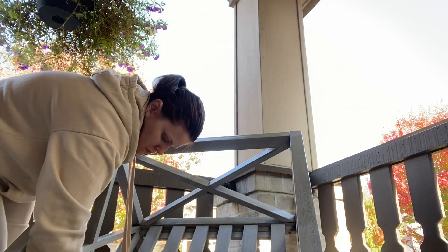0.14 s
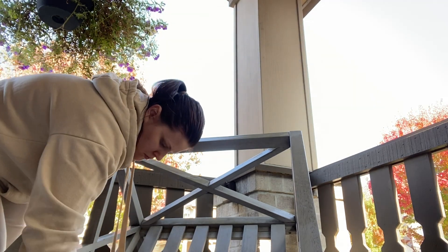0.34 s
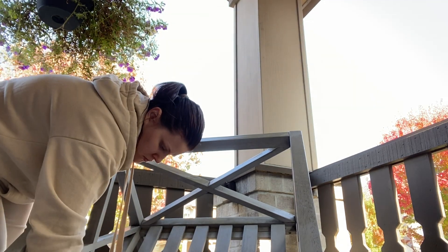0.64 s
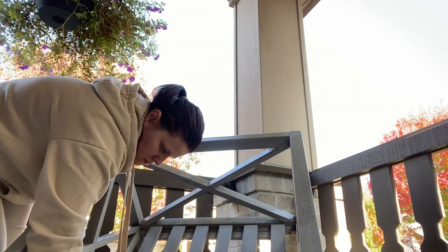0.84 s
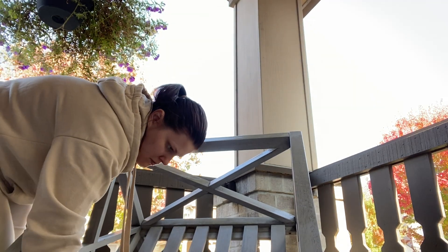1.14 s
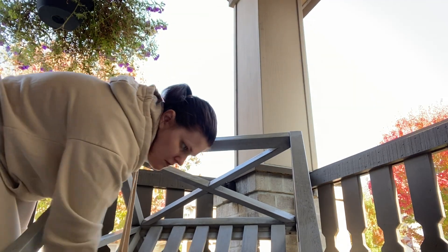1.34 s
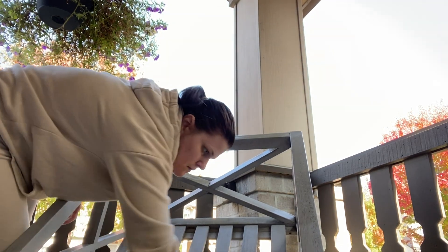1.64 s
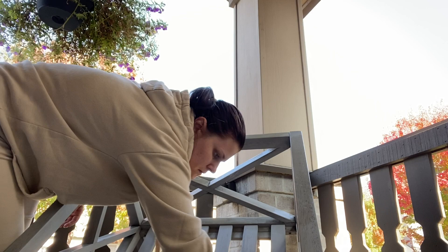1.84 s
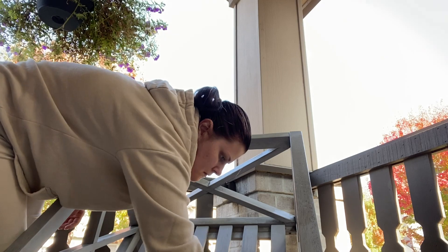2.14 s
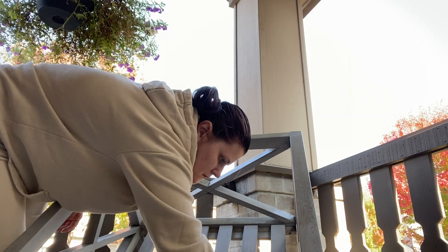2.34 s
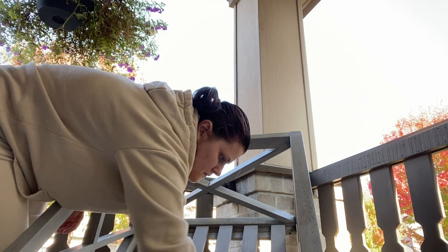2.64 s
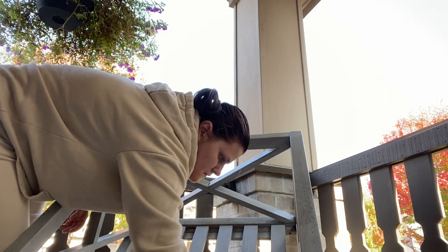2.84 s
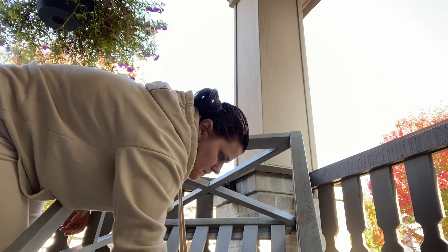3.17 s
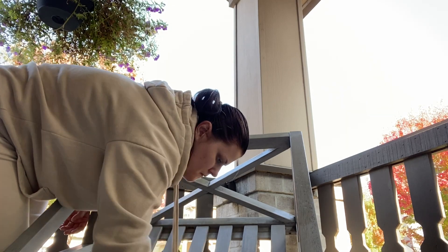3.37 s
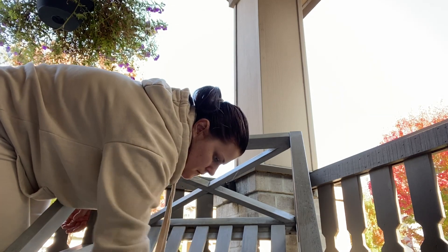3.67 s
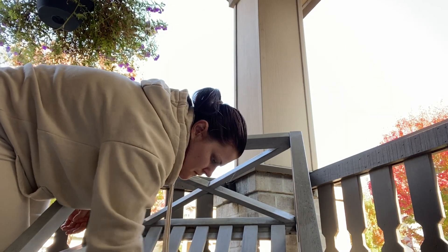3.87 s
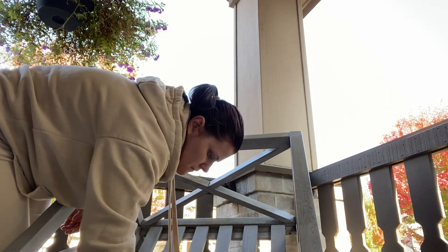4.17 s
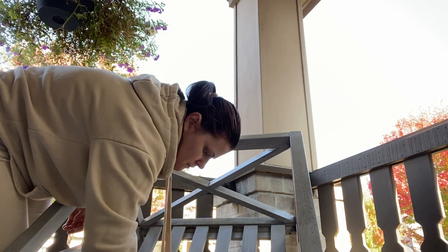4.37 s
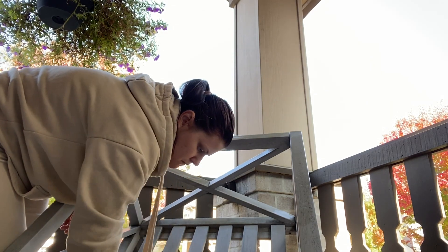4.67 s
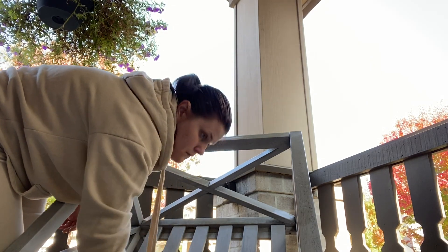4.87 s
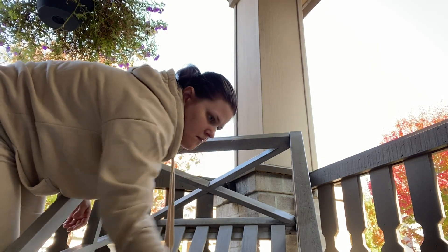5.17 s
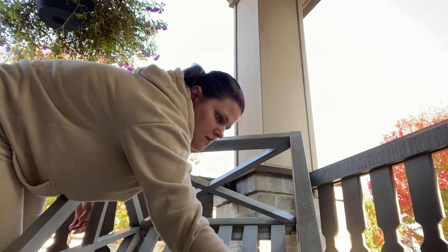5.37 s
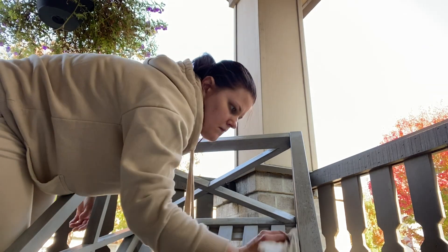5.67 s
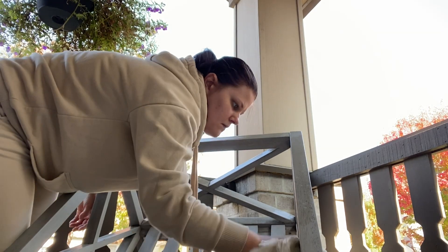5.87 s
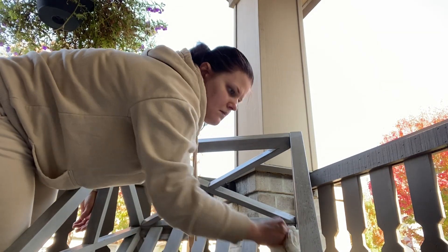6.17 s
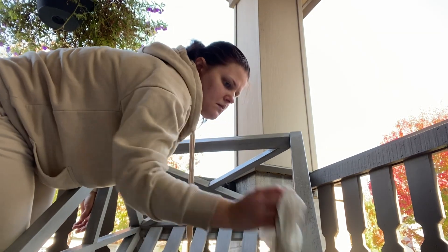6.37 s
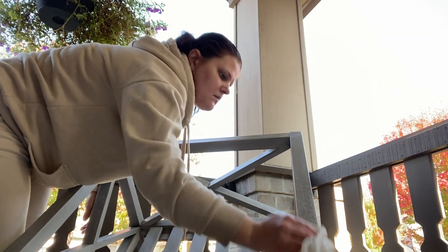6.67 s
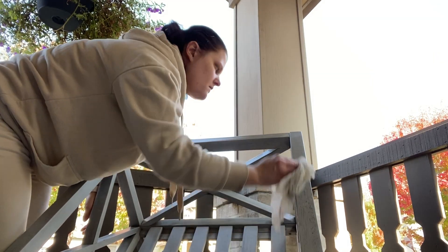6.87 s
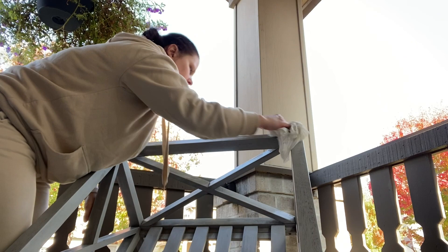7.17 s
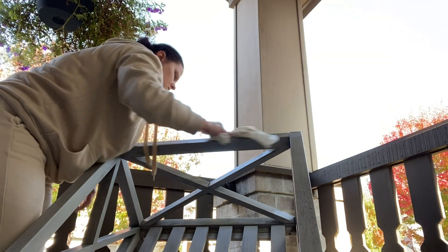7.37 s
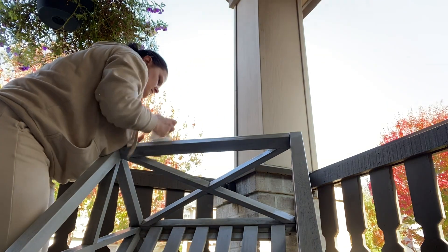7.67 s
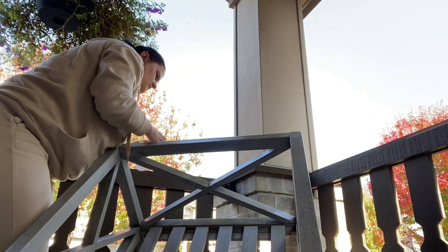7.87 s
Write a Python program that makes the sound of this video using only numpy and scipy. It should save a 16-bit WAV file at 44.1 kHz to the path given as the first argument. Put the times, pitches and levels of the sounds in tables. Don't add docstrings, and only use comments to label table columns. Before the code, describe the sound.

Distant traffic rumbles low throughout on an open porch, a nearer car swelling around 0.5 s, with very faint hiss. Close to the microphone a damp cloth wipes painted wooden slats in uneven flicks and drags, grainy and midrange-bright, with small low squeaks in the first second. A soft knock comes at 0.3 s, then firm hollow chair-leg knocks at 1.35 and 1.7 s, a slat humming briefly after. Rubbing continues, with a duller knock at 3.15 s and a sharper squeak and tick at 4.4 s. At 5.7 s a leg lands and skids on grit with a splintery crack. Strong knocks follow at 6.2, 6.35 and 6.75 s, boards booming and jolting the microphone, then a heel thud at 7 s. Longer airy wipes lead to small hard taps on the rail: chiming at 7.4 s, dull at 7.5 s, snappy at 7.95 s.

```python
import sys
import numpy as np
from scipy import signal
from scipy.fft import rfft, irfft, next_fast_len
from scipy.io import wavfile
from scipy.ndimage import uniform_filter1d

SR = 44100
rng = np.random.default_rng(int(sys.argv[2]) if len(sys.argv) > 2 else 0)


def wrap_up_sound(samples):
    columns = np.atleast_2d(samples).T
    tamed = np.clip(columns, -1, 1)
    steps = np.round(tamed * 32767).astype(np.int16)
    wavfile.write(sys.argv[1], SR, steps)


def decibels_to_gain(level_db):
    exponent = np.asarray(level_db, float) / 20
    return 10 ** exponent


N = 353241
HOP = 128


def read(points, hz):
    f, value = np.transpose(points)
    return np.interp(np.log(hz + 1), np.log(f + 1), value)


def evened(x):
    return x / np.sqrt(np.mean(x ** 2) + 1e-20)


def coloured(points):
    size = next_fast_len(N)
    gain = decibels_to_gain(read(points, np.fft.rfftfreq(size, 1 / SR)))
    return evened(irfft(rfft(rng.standard_normal((2, size))) * gain, size)[:, :N])


def bandpassed(x, low_hz, high_hz):
    return signal.lfilter(*signal.butter(2, [low_hz, high_hz], "bandpass", fs=SR), x)


def ring(modes, rise_cycles, scatter_db, spread):
    beat_depth, beat_share, detune = 0.6, 0.035, 0.012
    hz, db, t60 = np.transpose(modes)[:, :, None]
    t = np.arange(round(SR * min(t60.max(), 0.5))) / SR
    chance, turn, shift, apart = rng.standard_normal((4, 2, len(modes), 1))
    swell = (1 - np.exp(-t * hz / rise_cycles)) ** 2
    beat = 1 + beat_depth * np.cos(2 * np.pi * beat_share * hz * apart[0] * t)
    decay = decibels_to_gain(db + scatter_db * chance - 60 * t / t60)
    tone = np.sin(2 * np.pi * (hz * (1 + detune * shift[0]) * t + spread * turn))
    return (decay * swell * beat * tone).sum(1)


def tilted(modes, db_per_octave, centre_hz):
    return [(hz, db + db_per_octave * np.log2(hz / centre_hz), t60) for hz, db, t60 in modes]


def snap(low_hz, high_hz, t60, rise_s=0.00044):
    t = np.arange(SR // 8) / SR
    burst = rng.standard_normal((2, len(t))) * decibels_to_gain(-60 * t / t60) * (1 - np.exp(-t / rise_s))
    return bandpassed(burst, low_hz, high_hz)


def add(mix, s, db, sound):
    part = mix[:, round(s * SR):][:, :sound.shape[1]]
    part += decibels_to_gain(db) * sound[:, :part.shape[1]] / abs(sound[0]).max()


def lumpy(x):
    patchy_db = 2.5
    z = signal.stft(x, nperseg=8 * HOP)[2]
    lumps = rng.standard_normal(z.shape[:0:-1])
    lumps = uniform_filter1d(uniform_filter1d(lumps, size=6, axis=0), size=3, axis=1)
    return evened(signal.istft(z * decibels_to_gain(patchy_db * evened(lumps).T), nperseg=8 * HOP)[1][:, :N])


# time in seconds, level in dB.
TRAFFIC_SWELL = [(0.0, -45.5), (0.15, -48), (0.82, -46.5), (1.4, -51), (1.61, -46), (2.34, -48.5),
                 (2.88, -47), (3.77, -47), (4.35, -50.5), (4.55, -46.5), (5.29, -48), (6.0, -46.5),
                 (6.31, -50.5), (7.63, -48.5), (8.01, -49.5)]
# frequency in Hz, density in dB per Hz.
RUMBLE_SPECTRUM = [(20, -8.5), (40, -44.5), (55, 8), (100, 3), (160, -2.5), (230, -9), (400, -17.5),
                   (700, -83)]
ROAR_SPECTRUM = [(150, -1), (350, 3.5), (650, 3.5), (900, -1.5), (1300, -15.5), (2500, -29.5),
                 (4500, -33.5), (7500, -67)]
AIR_SPECTRUM = [(3000, -18), (5500, 1), (8000, 0), (12500, -3), (14200, -6), (15000, -24)]


def traffic():
    roar_level_db, roar_follows, air_db = -58.5, 0.23, -86.5
    pass_s, pass_width_s, pass_db = 0.54, 0.22, 4
    t = np.arange(N) / SR
    rumble_db = np.interp(t, *np.transpose(TRAFFIC_SWELL))
    near_db = pass_db / (1 + ((t - pass_s) / pass_width_s) ** 2)
    roar_db = roar_level_db + roar_follows * (rumble_db - rumble_db.mean()) + near_db
    rumble = decibels_to_gain(rumble_db + 3.0) * coloured(RUMBLE_SPECTRUM)
    roar = decibels_to_gain(roar_db) * lumpy(coloured(ROAR_SPECTRUM))
    return rumble + roar + decibels_to_gain(air_db) * coloured(AIR_SPECTRUM)


# start in seconds, length in seconds,
# pressure in dB, change of pressure in dB, fibre hiss over the rub in dB.
FLICKS = [(0, 0.014, -64, 0, -11), (0.188, 0.053, -75, 17.5, -8), (0.505, 0.045, -80, 14, -0.5),
          (0.643, 0.035, -64.5, -15.5, 0.5), (0.772, 0.028, -64, -1, -9), (0.946, 0.016, -57, -3.5, -8.5),
          (1.741, 0.092, -73, 14.5, -8), (1.936, 0.028, -63, 7.5, -12.5), (2.37, 0.038, -60, 3, -18.5),
          (2.618, 0.017, -69.5, 4, -12), (2.762, 0.13, -61, 3, -14.5), (3.036, 0.016, -98, 23.5, -13),
          (3.149, 0.047, -69, 4, -7), (3.426, 0.0093, -59, -1, -8.5), (3.559, 0.077, -68.5, 14.5, -8.5),
          (4.217, 0.032, -75.5, 14.5, -11.5), (4.395, 0.11, -54.5, -8, -9.5),
          (4.549, 0.046, -69.5, 7.5, -9), (4.728, 0.11, -62.5, -10.5, -11), (4.871, 0.046, -63.5, 0, -6.5),
          (5.741, 0.048, -73, 7.5, -8.5), (6.111, 0.089, -59, -14, -3.5), (7.722, 0.06, -72.5, 2.5, -29),
          (7.939, 0.06, -55.5, -12, -11)]
DRAGS = [(0.3, 0.14, -74, -19, -12), (1.04, 0.066, -84, 6, -9), (1.14, 0.11, -69.5, 2.5, -9),
         (1.326, 0.18, -65, -3, -9.5), (1.529, 0.16, -71, 2.5, -2), (1.864, 0.16, -72.5, 1.5, -6.5),
         (2.114, 0.27, -66.5, -7.5, -8), (3.223, 0.14, -83, -5, -21), (3.708, 0.083, -77, -15, -22),
         (3.906, 0.14, -75.5, 10, -7), (4.106, 0.066, -61.5, -15, -24), (4.952, 0.22, -64.5, -17.5, -14),
         (5.105, 0.15, -75, 12.5, -11.5), (5.299, 0.16, -71, 5.5, -7), (5.544, 0.069, -70, 1, -1.5),
         (5.86, 0.13, -69, 2.5, -3.5), (6.276, 0.19, -93, 23, -10), (6.578, 0.1, -73.5, 6.5, -4),
         (6.72, 0.26, -73, 2.5, -3), (6.985, 0.091, -80, 3, -5), (7.154, 0.37, -67, -6, -1.5),
         (7.375, 0.16, -67, 0, -6.5), (7.584, 0.21, -88, -24, -1)]


def pressure(t):
    land_db_per_s, lift_db_per_s, drag_softer = 1108, 325, 0.5
    usual_db, hiss_steeper = -68, 1.45
    drone_follows, fizz_follows, fizz_brighter = 0.75, 0.82, 1.28
    start, length, db, change_db, hiss_db = np.array(FLICKS + DRAGS).T[:, :, None]
    flick = (np.arange(len(start)) < len(FLICKS))[:, None]
    held_db = db + change_db * np.clip((t - start) / length, 0, 1)
    early_s, late_s = np.maximum(start - t, 0), np.maximum(t - start - length, 0)
    edge_db = -(land_db_per_s * early_s + lift_db_per_s * late_s) * np.where(flick, 1, drag_softer)
    over_db = held_db - usual_db
    drone_db = np.where(flick, -0.5, 1) + usual_db + drone_follows * over_db
    fizz_db = np.where(flick, -0.5, 1.5) + usual_db + fizz_follows * over_db + fizz_brighter * hiss_db
    layers_db = [held_db + edge_db,
                 drone_db + edge_db,
                 held_db + hiss_db + hiss_steeper * edge_db,
                 fizz_db + hiss_steeper * edge_db]
    return [np.sqrt((decibels_to_gain(layer_db) ** 2).sum(0) + 1e-14) for layer_db in layers_db]


# start in seconds, ringing in dB, three resonances in Hz.
SLATS = [(0.18, 1.7, 2450, 3100, 4860), (0.5, 5.7, 2680, 3100, 4440), (0.61, 9.9, 2630, 3620, 4560),
         (0.74, 6.6, 2280, 3470, 4700), (0.91, 7, 2660, 3380, 4670), (1.08, 2, 1840, 2100, 2570),
         (1.76, 4.2, 1840, 2250, 3270), (1.91, 2.7, 1480, 1930, 2420), (2.35, 1.9, 2030, 2830, 3900),
         (2.74, 1.7, 1390, 2180, 3270), (3.4, 5.9, 2030, 4570, 7800), (3.54, 4.7, 2140, 3760, 4500),
         (3.9, 3.6, 1830, 3120, 3760), (4.21, 4, 2110, 2530, 3800), (4.37, 8.3, 1330, 2600, 4140),
         (4.425, 7.6, 2560, 3960, 7200), (4.55, 1.7, 2000, 3300, 4000), (4.68, 4.5, 1920, 3180, 5440),
         (4.85, 1, 1990, 3100, 4060), (5.18, 1.7, 1880, 2230, 3670), (5.84, 0.91, 2130, 2300, 6740),
         (6.58, 3.9, 1260, 1790, 2140)]


def slat_tone_db(hz, t):
    place = uniform_filter1d(rng.standard_normal((len(t), len(hz))), size=40, axis=0)
    drift_db = 4.24 * evened(place).T * np.clip(1.2 - hz / 12000, 0, 1)[:, None]
    table = np.array(SLATS)
    slat = table[np.maximum(np.searchsorted(table[:, 0], t) - 1, 0)]
    peaks = sum(1 / (1 + ((hz[:, None] - f) / (70 + 0.025 * f)) ** 2) for f in slat[:, 2:].T)
    return drift_db + 1.5 * slat[:, 1] * (peaks - 0.3)


# frequency in Hz, density in dB per Hz.
RUB_SPECTRUM = [(700, -52), (1500, -14.5), (2200, 6.5), (4200, 2.5), (5200, -10), (8000, -23), (15000, -7)]
DRONE_SPECTRUM = [(400, -8), (900, 6.5), (1300, 1), (1800, 1.5), (3000, -20.5)]
HISS_SPECTRUM = [(2500, 8), (5000, 14.5), (8000, 13), (11000, 12.5), (14000, 10), (16000, 10)]


def cloth():
    grit_per_s, grit_db = 500, -11
    steps = np.arange(0, N + HOP, HOP // 2) / SR
    rub, drone, hiss, _ = (np.interp(np.arange(N) / SR, steps, gain) for gain in pressure(steps))
    grain = decibels_to_gain(2.0 * uniform_filter1d(rng.standard_normal(N), size=60) * np.sqrt(60))
    slips = decibels_to_gain(-3.5) * rub * coloured(RUB_SPECTRUM)
    slips += decibels_to_gain(-1.5) * drone * coloured(DRONE_SPECTRUM)
    slips += decibels_to_gain(6.5) * hiss * coloured(HISS_SPECTRUM)
    speck_size = decibels_to_gain(4.4 * np.minimum(rng.exponential(1, N), 4))
    specks = (rng.random(N) < grit_per_s / SR) * speck_size * rng.choice([-1., 1.], (2, N))
    slips += decibels_to_gain(grit_db) * rub * evened(bandpassed(specks, 1800, 7000))
    hz, t, z = signal.stft(evened(grain) * slips, SR, nperseg=4 * HOP, noverlap=3 * HOP)
    _, _, hiss, fizz = pressure(t)
    finest = np.where(hz[:, None] > 10500, fizz / hiss, 1)
    z = z * decibels_to_gain(slat_tone_db(hz, t)) * finest
    return signal.istft(z, SR, nperseg=4 * HOP, noverlap=3 * HOP)[1][:, :N]


# start in seconds, length in seconds, rms level in dB, frequency in Hz.
SQUEAKS = [(4.381, 0.014, -53, 1330), (4.392, 0.026, -58, 2560), (4.386, 0.032, -60, 2690),
           (4.392, .022, -63, 3980), (4.395, .015, -68, 4250), (4.43, 0.078, -73, 2560),
           (4.44, .06, -70, 2830), (4.43, .07, -66, 3830), (4.555, .05, -77, 3400), (4.4, 0.018, -63, 2050),
           (4.743, .03, -79, 3100), (4.864, 0.035, -64, 2030), (4.88, .03, -79, 3900),
           (.13, 0.044, -61.5, 766), (.0, 0.027, -59, 604), (0.725, .07, -60.5, 600),
           (0.91, 0.027, -58.5, 656), (0.997, .05, -60, 643), (2.386, 0.044, -62, 2030),
           (2.834, 0.058, -67, 1340), (4.237, 0.035, -69, 2120)]
RUSTLES = [(1.03, 0.31, -76.5, 2570), (1.1, .22, -80, 2300), (1.15, 0.21, -82, 2250),
           (3.25, .13, -86, 2050), (3.27, 0.09, -86, 2450), (3.74, 0.15, -85, 2050), (3.72, .12, -87, 2550),
           (.625, 0.028, -69, 2870), (.545, .03, -69, 2750), (.955, 0.018, -67, 2900),
           (.94, 0.027, -74, 4350), (2.78, 0.095, -67, 3150), (3.1, .04, -73, 2230),
           (3.42, 0.022, -64, 3800), (3.43, .03, -67, 3050), (3.56, .04, -64, 2980),
           (3.905, 0.035, -78, 3040), (4.5, 0.046, -72, 3400), (4.16, .06, -78, 3650),
           (4.74, .04, -72, 5900), (4.875, .05, -68, 5500), (4.88, .03, -76, 7500), (5.21, .1, -72, 1700),
           (5.22, 0.24, -85, 2800)]


def squeaks():
    rise_s, t60 = 0.0046, 0.067
    out, t = np.zeros((2, N)), np.arange(SR // 4) / SR
    for rows, width_hz, steady in (SQUEAKS, 70, 0.9), (RUSTLES, 220, 0):
        pole = np.exp(-np.pi * width_hz / SR)
        for s, length, db, hz in rows:
            real, imag = rng.standard_normal((2, 2, 2 * len(t)))
            noise = signal.lfilter([1], [1, -pole], real + 1j * imag)[:, len(t):]
            sway = steady + np.sqrt((1 - pole ** 2) / 2) * noise
            tone = evened((sway * np.exp(2j * np.pi * (hz * t + rng.random((2, 1))))).real)
            tone *= np.minimum(t / rise_s, 1) * decibels_to_gain(-60 * np.maximum(t - length, 0) / t60)
            add(out, s, db + 20 * np.log10(abs(tone[0]).max()), tone)
    return out


# time in seconds, peak in dB, centre in Hz.
TICKS = [(0.575, -55, 1400), (1.2705, -46.5, 1840), (1.7617, -49, 1500), (3.1845, -45, 1650),
         (4.345, -51, 1560), (4.386, -54, 1340), (4.3965, -44, 3000), (4.8757, -71, 2030),
         (5.688, -60, 8500), (5.687, -50, 2680), (5.706, -61, 2130), (6.099, -57.5, 1990),
         (7.714, -55.5, 1430), (7.914, -54.5, 2050)]
BUMPS = [
    (0.137, -72, 750),
    (0.434, -46.5, 710),
    (0.903, -65, 656),
    (6.541, -58, 635),
    (6.979, -43, 600),
]


def catches():
    out = np.zeros((2, N))
    for s, db, hz in TICKS + BUMPS:
        add(out, s - 0.001, db + 1.0, snap(hz / 1.98, hz * 1.5, 0.13))
    return out


# time in seconds, peak in dB, boards over the frame in dB,
# contact crack over the frame in dB, hardness in dB per octave.
KNOCKS = [(0.303, -45, 5, -30, -4), (1.356, -25, -7, -7.5, -3), (1.704, -26, -6, -19, -8.5),
          (2.628, -47, 0, -26, -4), (3.164, -32.5, -5.5, -38, -9), (3.36, -54.5, 12, -15, 8),
          (4.397, -50, 13.5, -2, -7), (5.688, -27.5, -3.5, -21, -5), (5.708, -38.5, -21, -13, -20),
          (6.211, -24.5, -6, -13.5, -7.5), (6.364, -28.5, -2, -30, -5.5), (6.458, -36.5, -5, -22, -11.5),
          (6.74, -25.5, -5.5, -16, -4.5), (6.98, -51, -27, -11, -6)]
# frequency in Hz, level in dB, t60 in seconds.
CRACK_MODES = [(1114, 2, 0.031), (1242, 7, 0.041), (1330, 10, 0.049), (1500, -10, 0.023), (1700, 1, 0.023),
               (1970, 1.5, 0.036), (2430, -5.5, 0.025), (2675, -7, 0.045), (3100, 3.5, 0.012),
               (3800, -7, 0.021)]
FRAME_MODES = [(157.3, -6, 0.056), (201.5, -0.5, 0.068), (231.5, 0, 0.058), (267.8, -1.5, 0.069),
               (300.7, -2.5, 0.065), (318.5, -9, 0.15), (356.4, -10, 0.066), (390, -14, 0.054),
               (428, -8, 0.059), (484.3, -7, 0.084), (667, -26, 0.1), (820, -18.5, 0.049),
               (940, -22.5, 0.067)]
BOARD_MODES = [(52.4, -7.5, 0.68), (77.7, -10, 0.75), (89, 16.5, 0.047), (113, 0.5, 0.065)]


def knocks():
    rebound_s, rebound_db = 0.061, -18
    out = np.zeros((2, N))
    for s, db, boards_db, crack_db, hardness_db in KNOCKS:
        add(out, s - 0.004, db + crack_db - 0.5, ring(CRACK_MODES, 2.5, 2.5, 0.43))
        add(out, s - 0.004, db + crack_db - 9.5, snap(650, 3600, 0.09))
        add(out, s - 0.0005, db, ring(tilted(FRAME_MODES, hardness_db + 0.5, 300), 1.2, 1.5, 0.04))
        add(out, s + 0.0133, db + boards_db, ring(BOARD_MODES, 1.0, 0.56, 0.23))
        add(out, s + 0.0071, db + crack_db - 2.5, snap(400, 1900, 0.076))
        add(out, s + rebound_s, db + rebound_db, ring(tilted(FRAME_MODES, 0.64, 300), 2.5, 1.3, 0.08))
    return out


# frequency in Hz, level in dB, t60 in seconds.
JOLT_MODES = [(53.5, 3, 0.16), (98, -17, 0.049), (122.4, 4.5, 0.17), (600, -6, .06)]


def jolts():
    over_frame_db = 2.4
    out = np.zeros((2, N))
    for s, db, *_ in KNOCKS:
        shake = ring(JOLT_MODES, 0.42, 0.66, 0.03)[0]
        add(out, s - 0.002, db + over_frame_db, shake * [[1], [-1]])
    return out


# frequency in Hz, level in dB, t60 in seconds.
LOOSE_SLAT = (-48, [(640, -5, 0.32), (687, 1, 0.73), (690, 7, 0.15)])


def loose_slat():
    out, (peak_db, modes) = np.zeros((2, N)), LOOSE_SLAT
    add(out, 1.755, peak_db, ring(modes, 3.9, 2.4, 0.03))
    return out


# time in seconds, peak in dB, frequency in Hz, t60 in seconds.
SPLINTERS = [(5.689, -41, 2600, 0.035), (5.693, -47, 1800, 0.018), (5.691, -61, 3000, .02),
             (5.704, -42.5, 2550, .02), (5.7058, -33, 740, 0.0091), (5.709, -41, 1420, .02),
             (5.7, -55, 8300, .01), (6.363, -53, 1250, .05), (5.717, -61, 1000, 0.031),
             (6.209, -43.5, 1320, 0.034), (6.743, -38.5, 1220, 0.077)]


def skid():
    out = np.zeros((2, N))
    for s, db, hz, t60 in SPLINTERS:
        add(out, s, db, ring([(hz, 0, t60), (1.3 * hz, -6, t60)], 0.96, 1.0, 0.2))
    return out


# frequency in Hz, level in dB, t60 in seconds.
HEEL = (-37, [(159.4, 8, 0.064), (216, -4.5, 0.09), (600, -16, 0.048)])


def heel():
    out, (peak_db, modes) = np.zeros((2, N)), HEEL
    add(out, 6.982, peak_db, ring(modes, 0.98, 1.2, 0.027))
    return out


# time in seconds, peak in dB, chime over the wood in dB,
# snap over the wood in dB.
TAPS = [
    (7.3803, -33, -3.5, -26),
    (7.4918, -35.5, -30, -34),
    (7.9347, -36.5, -17, -10),
]
# frequency in Hz, level in dB, t60 in seconds.
RAIL_MODES = [
    [(950, -4.5, 0.13), (1230, 0, 0.067), (2030, 2, 0.1), (2100, 0, 0.16), (2880, -14, .06),
     (3150, -4.5, 0.044), (3530, -13, 0.066), (4320, 0, .03), (4510, 1.5, 0.04)],
    [(1290, -3, .05), (1780, -11, .03), (2050, 6, 0.044), (2440, 0, 0.035), (2700, 3, 0.038),
     (3500, -9, .04), (3900, -8, .04), (4500, -15.5, .04), (5750, -24, .04)],
    [(1610, -5, .035), (2000, -2, 0.065), (2750, -7, 0.043), (3230, -14, .05), (3730, -2, .09),
     (4630, -5, .04), (5800, -3, 0.036), (7100, -4, 0.052), (8960, -6, 0.061)],
]
# frequency in Hz, level in dB, t60 in seconds.
RING_MODES = [(7800, -20, .03), (8900, -13, .03), (11280, -1, 0.041), (12200, -15, 0.018)]


def taps():
    out = np.zeros((2, N))
    for (s, db, chime_db, snap_db), modes in zip(TAPS, RAIL_MODES):
        add(out, s, db, ring(modes, 0.8, 1.0, 0.14))
        add(out, s, db - 5.5, snap(2250, 3940, 0.067))
        add(out, s, db + chime_db, ring(RING_MODES, 2.3, 1.1, 0.2))
        add(out, s, db + snap_db + 14, snap(6800, 12500, 0.014, rise_s=0.0001))
    return out


# frequency in Hz, t60 in seconds.
PORCH_T60 = [(200, 0.33), (1000, 0.25), (4000, 0.17), (12000, 0.2)]


def porch(x):
    echoes = rng.choice([-1., 1.], (2, SR // 2)) * (rng.random((2, SR // 2)) < 0.05)
    echoes[:, :150] = 0
    hz, t, z = signal.stft(echoes, SR, nperseg=2 * HOP)
    decay = decibels_to_gain(-60 * t / read(PORCH_T60, hz)[:, None])
    tail = signal.istft(z * decay, SR, nperseg=2 * HOP)[1]
    return signal.fftconvolve(x, tail / np.linalg.norm(tail[0]), axes=1)[:, :N]


# frequency in Hz, left-right likeness from 0 to 1.
LIKENESS = [(50, 0.99), (150, 0.81), (300, 0.58), (600, 0.29), (1500, 0.14), (6500, 0.097), (7500, 0.99),
            (16000, 0.95)]
# frequency in Hz, left over right in dB.
LEFT_OVER_RIGHT = [(50, -2), (120, 1), (400, -2.5), (1500, -1), (4500, -2), (7500, -0.5)]


def ports(paths):
    lag_s, flip_hz = 1.508 / 7880, 418
    size = next_fast_len(N)
    hz, (left, other) = np.fft.rfftfreq(size, 1 / SR), rfft(paths, size)
    same = np.clip(read(LIKENESS, hz), 0, 1)
    lead = np.pi / (1 + (flip_hz / (hz + 1)) ** 6) - 2 * np.pi * hz * lag_s
    right = same * np.exp(1j * lead) * left + np.sqrt(1 - same ** 2) * other
    tilt = decibels_to_gain(read(LEFT_OVER_RIGHT, hz) / 2)
    return irfft(np.array([left * tilt, right / tilt]), size)[:, :N]


def scene():
    far = traffic()
    rubbing = cloth() + squeaks()
    blows = catches() + knocks() + loose_slat() + skid() + heel() + taps()
    echoes = porch(decibels_to_gain(-7.5) * blows + decibels_to_gain(-5.0) * rubbing)
    return ports(blows + rubbing + echoes + far) + jolts()


def band_limit(x):
    return signal.sosfilt(signal.butter(12, 15990, fs=SR, output="sos"), x)


def record(dry):
    mix = signal.oaconvolve(dry, signal.firwin(255, 15600, fs=SR)[None], "same")
    return band_limit(mix)


dry = scene()
out = record(dry)
wrap_up_sound(out)
```